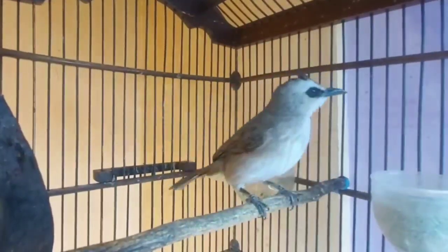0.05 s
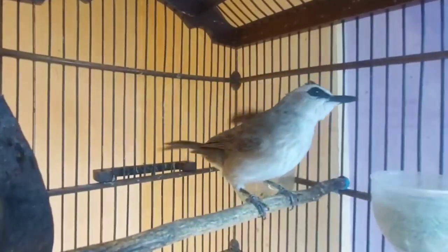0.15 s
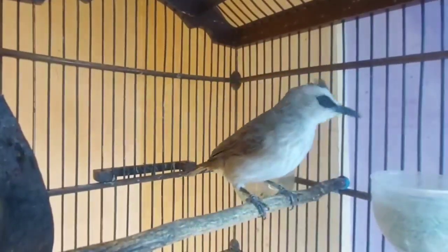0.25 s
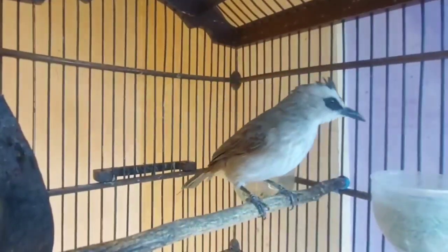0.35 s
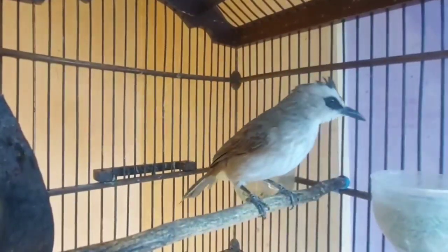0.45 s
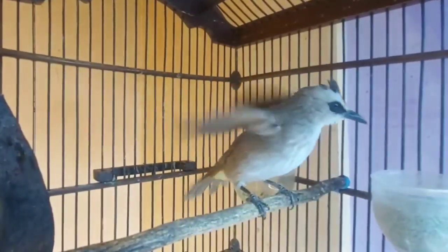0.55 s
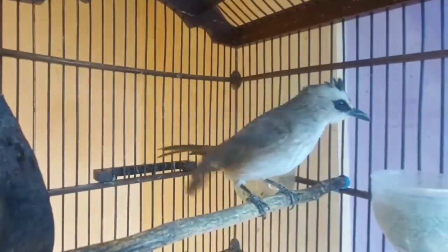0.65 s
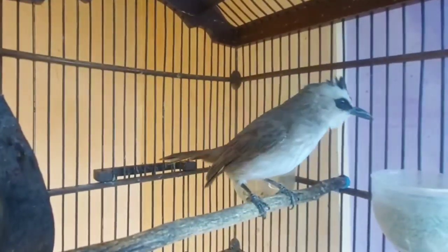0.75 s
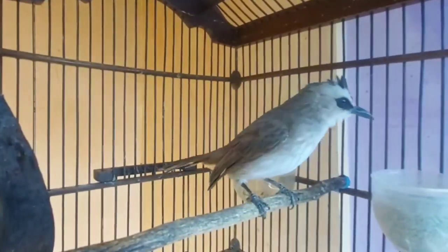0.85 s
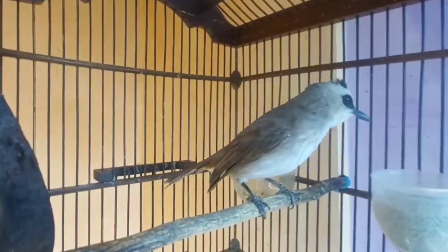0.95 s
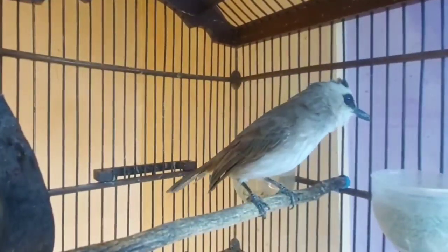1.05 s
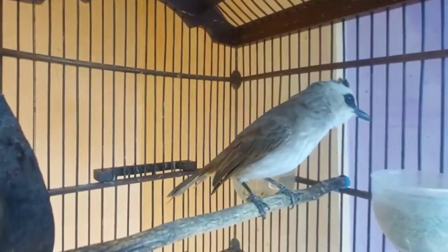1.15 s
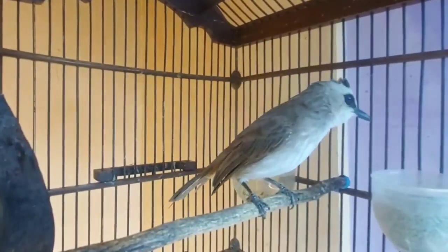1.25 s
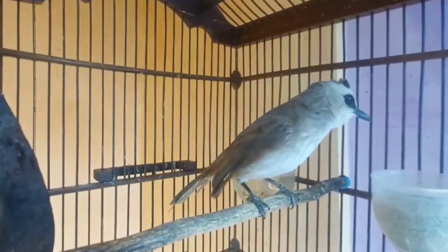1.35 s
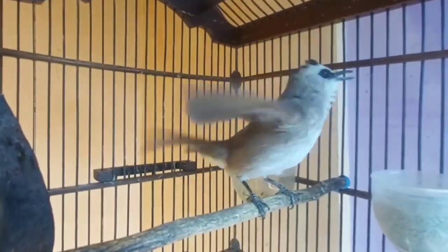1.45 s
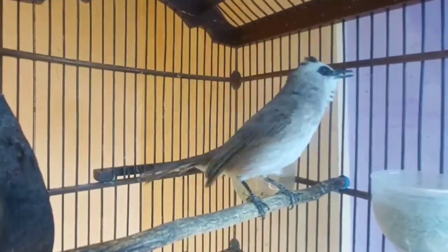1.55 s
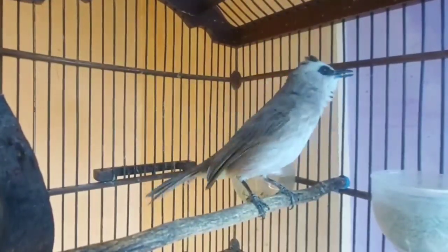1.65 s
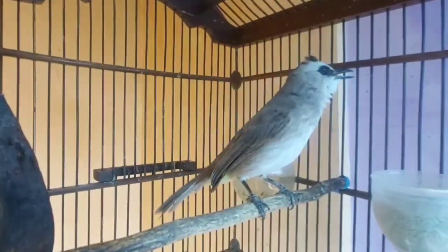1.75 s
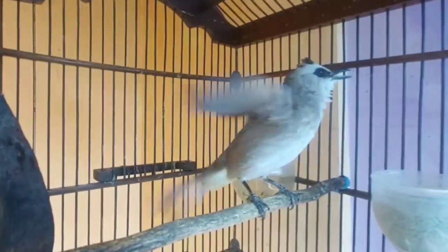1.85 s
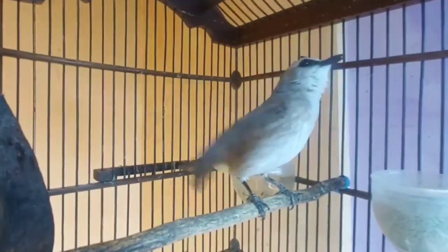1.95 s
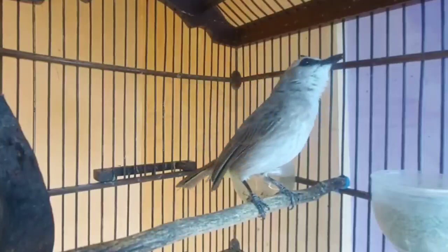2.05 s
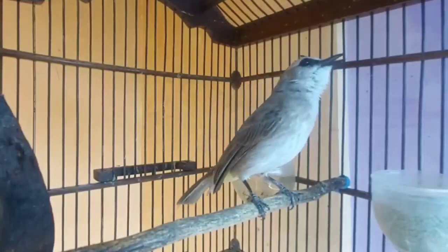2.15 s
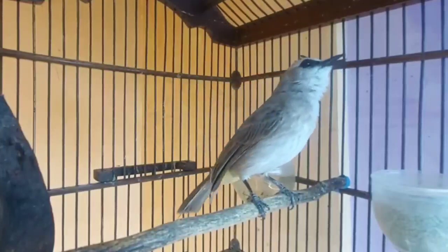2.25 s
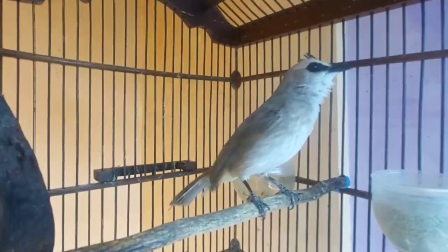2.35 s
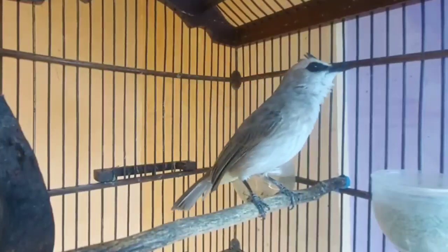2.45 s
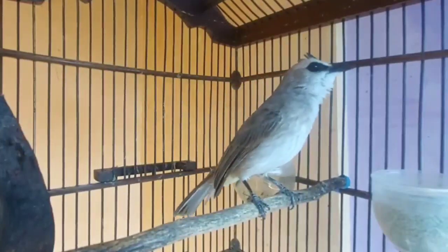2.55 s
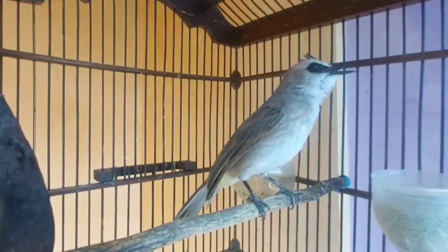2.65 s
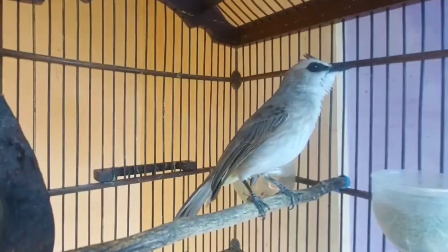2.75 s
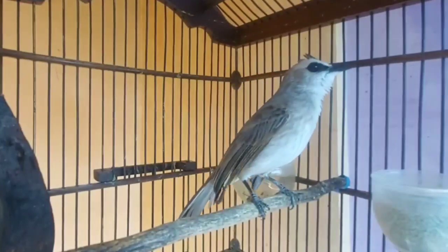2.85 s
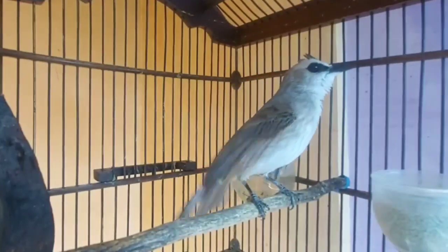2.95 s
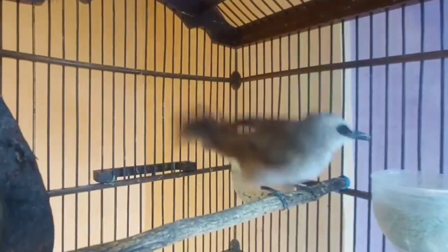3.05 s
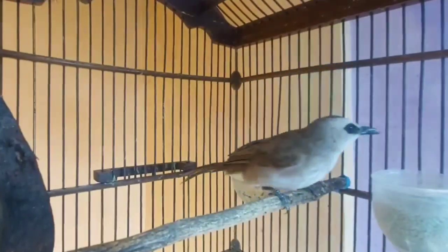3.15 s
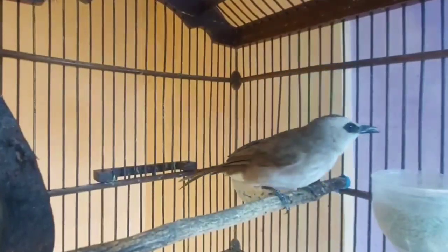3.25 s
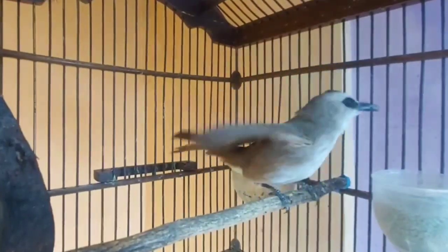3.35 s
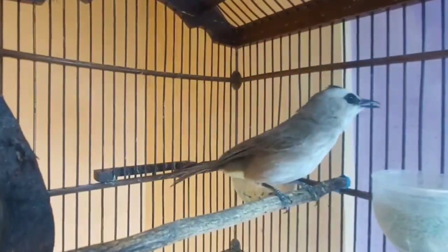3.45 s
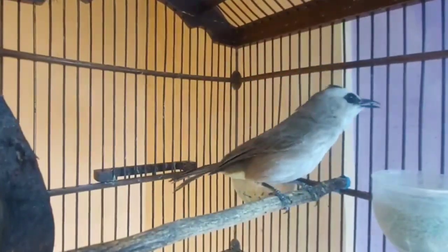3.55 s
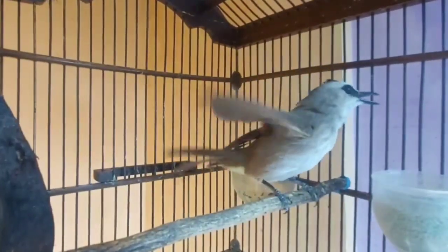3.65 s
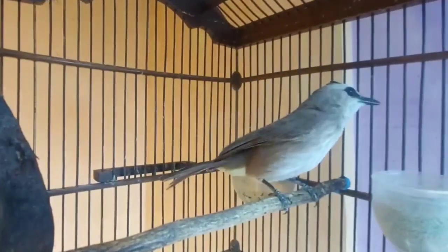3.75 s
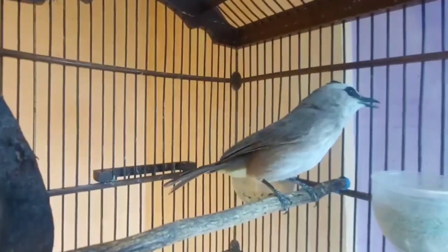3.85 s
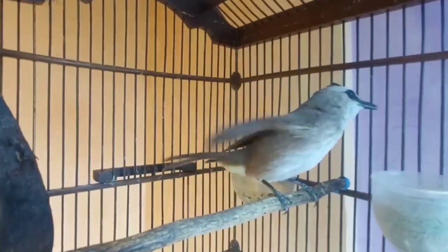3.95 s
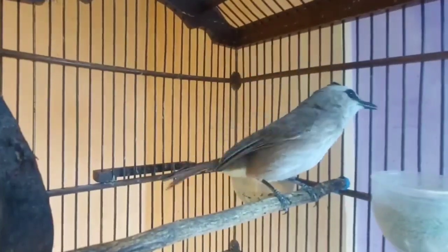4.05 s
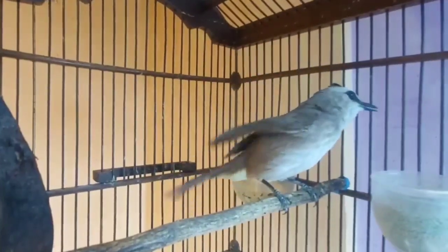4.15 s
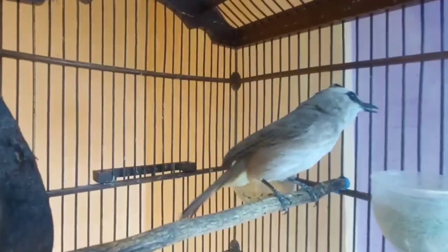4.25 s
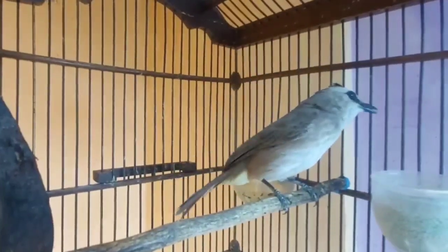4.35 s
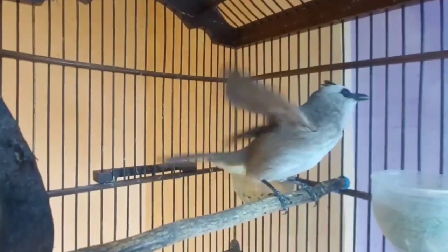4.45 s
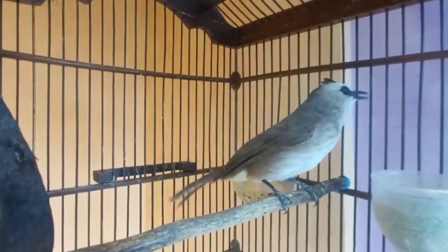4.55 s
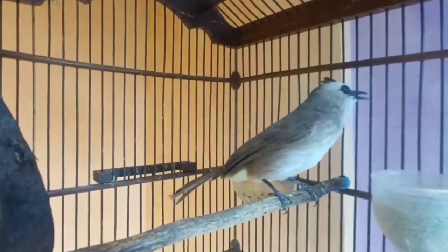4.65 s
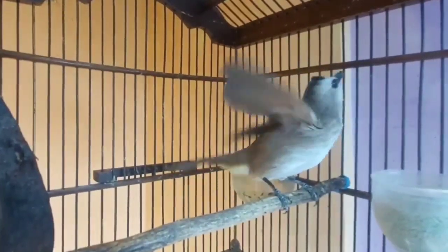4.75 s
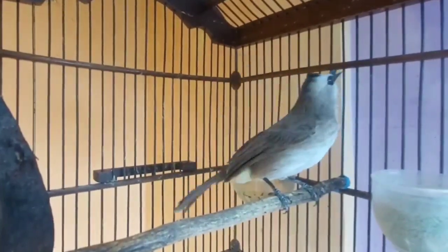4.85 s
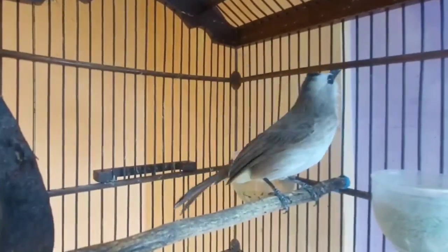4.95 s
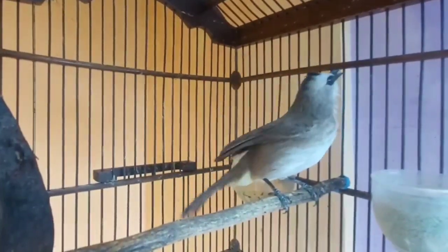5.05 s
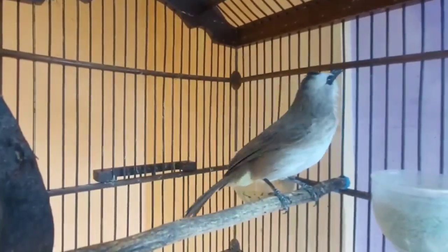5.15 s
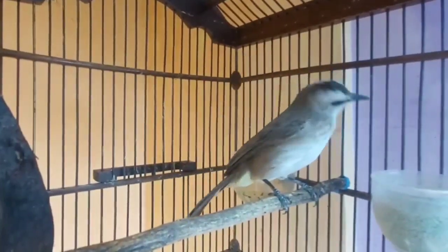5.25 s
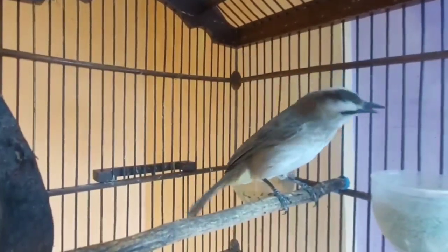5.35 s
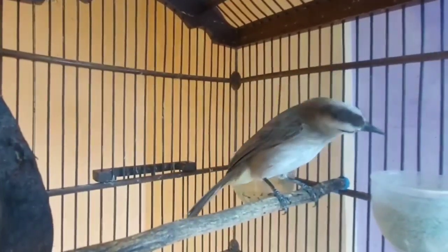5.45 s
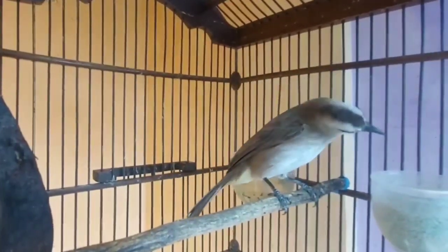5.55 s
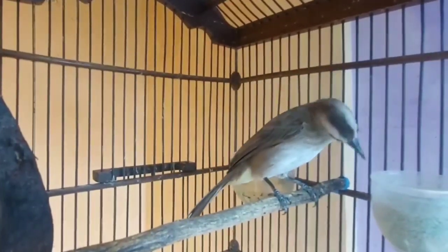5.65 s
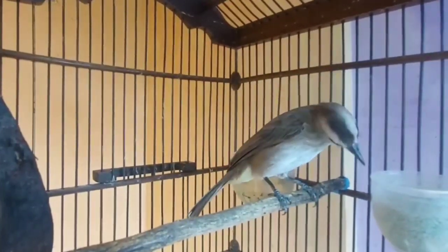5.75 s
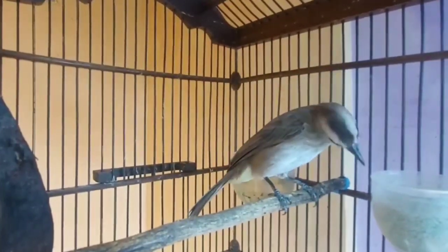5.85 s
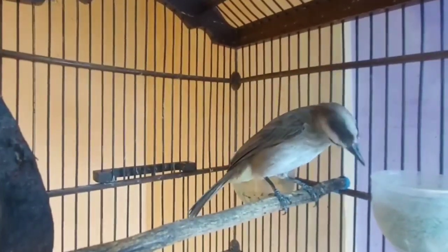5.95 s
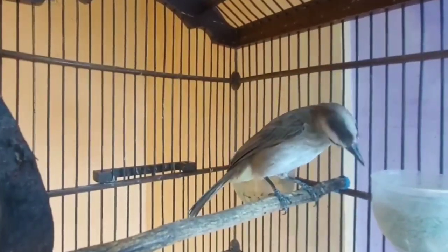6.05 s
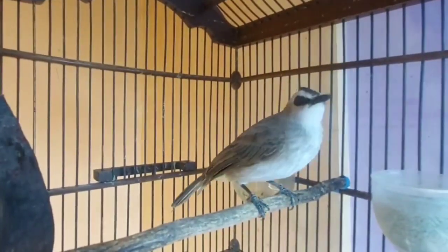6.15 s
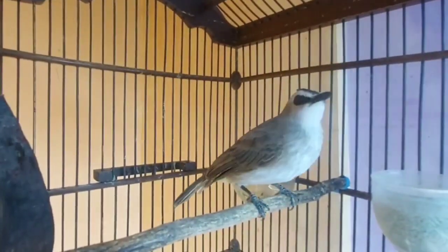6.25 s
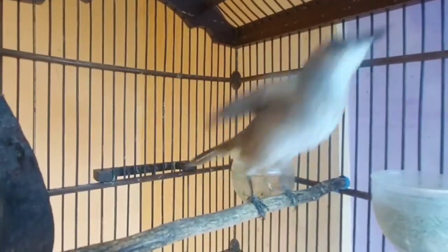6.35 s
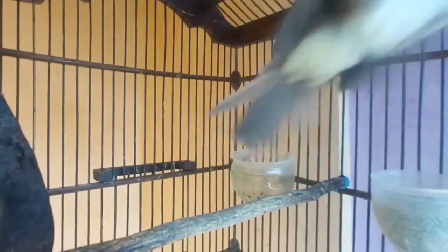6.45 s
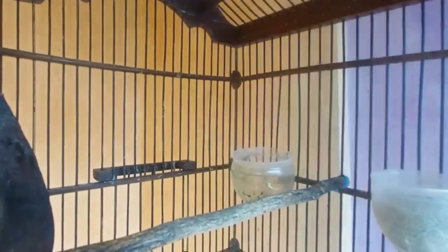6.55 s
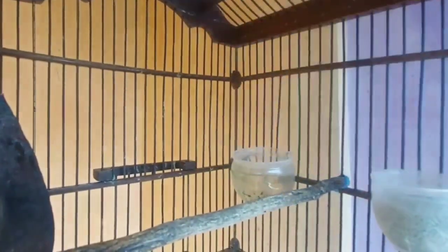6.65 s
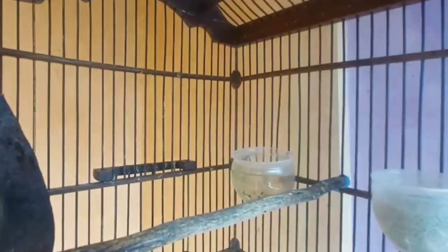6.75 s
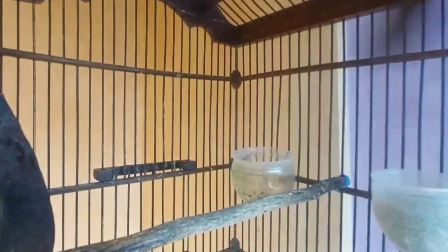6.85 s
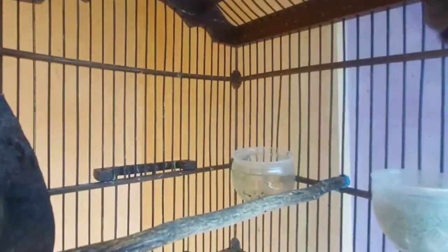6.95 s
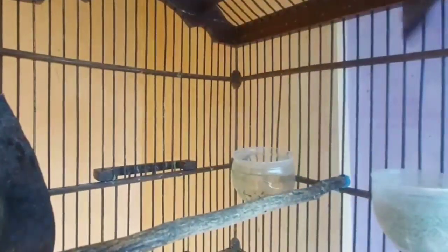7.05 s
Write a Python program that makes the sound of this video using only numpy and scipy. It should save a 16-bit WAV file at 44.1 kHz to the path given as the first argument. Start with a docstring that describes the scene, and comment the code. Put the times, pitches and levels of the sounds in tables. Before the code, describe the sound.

Loud, bright bird calls in a small room: chups, bubbling warbles, spaced chips, a wing flurry and fading yelps over low hum.

```python
"""Faint whistles of other birds over rumble, hiss and mains hum, then a caged bulbul close by, indoors:
two low chups, three bubbling phrases, a run of sharp chips, two cheeps and three yelps as it flies off.
Calls are buzzing sine sweeps with overtones and air noise; far birds are gliding sines.
Wings and claws are shaped noise; the hum is sines, rumble and hiss are noise.
Discrete echoes and a decaying tail of sparse taps give the near walls and the room."""
import sys
import numpy as np
from scipy import signal
from scipy.fft import rfft, irfft, next_fast_len
from scipy.io import wavfile

SR = 44100
rng = np.random.default_rng(int(sys.argv[2]) if len(sys.argv) > 2 else 0)


def dump(signal):
    """Clip the signal to [-1, 1] and save it as 16-bit WAV at the path in sys.argv[1]."""
    limited = np.clip(np.atleast_2d(signal).T, -1, 1)
    pcm = np.round(limited * 32767).astype(np.int16)
    wavfile.write(sys.argv[1], SR, pcm)


N = 312669

# Syllable shapes, before each call's stretch, pitch factor and level:
# time_s, pitch_hz, level_db, buzz_depth [share of pitch], second_harmonic_db [re fundamental]
CHUP = [(0, 2595, -26.5, 0.0061, -27.5), (.005, 2500, -17, 0.037, -25.5), (.008, 1968, -3, 0.088, -29),
        (.013, 2029, -5, 0.032, -37), (.020, 1888, 1.5, .01, -30), (0.028, 1610, -7, .01, -32.5),
        (.034, 1473, -5.5, 0.00032, -25.5), (.039, 1338, -20, .02, -36)]
CHIP = [(0, 2687, -26.5, 0.0016, -26.5), (.0045, 2346, -7, .01, -30.5), (.011, 2056, -13, 0.027, -5.5),
        (0.0138, 2978, 1, 0.0028, -31), (0.02, 2875, -3.5, 0.037, -39), (.028, 2389, -5, 0.083, -28),
        (.036, 2341, 1, .012, -36), (.055, 2144, -6.5, .008, -32.5), (.058, 2101, -22, .006, -37.5)]
BUZZ = [(0, 4095, -34.5, 0.088, -47), (.006, 3510, -7, .16, -20), (.010, 2839, 2.5, 0.071, -36.5),
        (.022, 2440, 2, 0.1, -40.5), (.055, 2050, -2.5, .19, -29.5), (.074, 1807, -13.5, 0.15, -22),
        (.081, 1630, -43, .1, -33)]
RISE = [(0, 894, -25.5, 0.054, 4), (.004, 1096, -21, .05, 12.5), (.015, 1467, -9.5, .05, -6.5),
        (.024, 2067, 2.5, 0.027, -38.5), (.035, 2390, -0.5, 0.029, -47.5), (.044, 2780, -12.5, .015, -33.5),
        (.049, 2662, 2, 0.013, -41), (.057, 1285, -7.5, 0.14, -25.5)]
WHISTLE = [(0, 2710, -6.5, .005, -49), (.004, 2805, 7, 0.0068, -41), (.010, 2700, 2, 0.0053, -48),
           (0.016, 2450, 8, .002, -39.5), (.027, 2274, -22, 0.00019, -40.5)]
UPSLUR = [(0, 1215, -19.5, .03, -31.5), (.005, 1955, -7, 0.056, -25.5), (.011, 2940, 0.5, 0.026, -47),
          (0.02, 2790, -11.5, .006, -25.5), (0.03, 2853, 4.5, 0.0043, -50), (.043, 3057, -3, 0.0063, -27),
          (.053, 3190, 3, .006, -37.5), (0.058, 3545, -3, 0.0054, -31), (.065, 3450, -40.5, .01, -41)]
DROP = [(0, 3230, -33, 0.018, -22), (.004, 2723, 0.5, 0.033, -52), (.010, 2180, 0.5, 0.062, -25),
        (0.016, 1476, -12.5, 0.025, -4.5), (.026, 1126, -23, 0.16, 3), (0.042, 1284, -20.5, 0.22, -4.5),
        (0.05, 2100, -18, .04, -23.5), (.053, 1990, -3, .01, -32), (0.067, 1710, -17.5, .012, -34.5)]
CHEEP = [(0, 3480, -16, 0.017, -26), (.004, 2940, -3.5, 0.031, -34), (.008, 2683, 6, 0, -29),
         (0.012, 2400, -10.5, .02, -13), (.016, 2504, 3, .003, -22), (.023, 2370, 5.5, .006, -27),
         (.031, 2167, 1, 0.0094, -15.5), (.040, 2220, -15, 0, -37)]
YELP = [(0, 3440, -48, 0.0035, -30), (.004, 2813, 6.5, 0.013, -36), (.007, 2567, 10.5, .03, -34),
        (.010, 1627, -3, 0.019, 2.5), (.012, 1914, -0.5, 0.055, 2), (0.017, 2280, 10, 0.026, -16.5),
        (0.022, 2300, 10, .01, -46), (.030, 2165, 7, .01, -48), (.035, 2080, -25, .01, -31)]
# Filters for overtones and air: beak nearly shut, open, gaping, head turned away: freq_hz, gain_db
SHUT = [(3000, -12.5), (4500, -36), (5700, -36), (7500, -44), (11500, -39), (14500, -37.5), (16500, -39.5)]
OPEN = [(3000, -19.5), (4300, -35), (5400, -39.5), (6700, -38), (8000, -46.5), (9200, -33.5), (10300, -21),
        (11800, -31), (13000, -36.5), (14300, -42), (15300, -43), (16500, -49.5)]
WIDE = [(3000, -20), (4300, -33), (5400, -37.5), (6700, -37.5), (7900, -46.5), (9200, -23), (10300, -25.5),
        (11800, -24.5), (13000, -27), (14300, -51), (15300, -38), (16500, -41.5)]
AWAY = [(3000, -9.5), (5500, -33), (7200, -40.5), (8000, -40), (10200, -42), (11600, -30), (13000, -38),
        (14800, -28), (16500, -31)]
# Two low opening chups: start_s, level_db
CHUPS = [(0.807, -1.5), (1.121, -1)]
# Falling buzz that opens each phrase: start_s, level_db, stretch [x time], pitch [x]
BUZZES = [(1.508, -9.5, 1.144, 0.92), (1.884, -8.5, 1.165, 0.93), (2.298, -9, .89, 0.98)]
# Deep swoop in the last phrase: start_s, level_db
DROPS = [(2.371, -7)]
# Warble that ends each phrase: start_s, level_db, pitch [x], harsh_db
WARBLES = [(1.633, -10.5, 1.002, 2.5), (2.029, -9.5, 1.0, 0.5), (2.523, -10, 0.97, 1)]
# Notes of a warble: delay_s, shape, level_db, overtones_first_db, overtones_last_db
WARBLE = [(0, RISE, 1, -6.5, 3.5), (.071, WHISTLE, -1, 3.5, -8.5), (.131, UPSLUR, -0.5, 6.5, 0)]
# Run of chips: start_s, level_db, stretch [x time], pitch [x], harsh_db, added_buzz_depth [share of pitch]
CHIPS = [(3.475, -5, 0.74, .9, 6, .05), (3.725, -4, 0.98, 0.94, 1, .005), (3.962, -4, 0.89, 0.93, 3, .035),
         (4.173, -2.5, 0.92, 0.98, 0.5, .003), (4.299, -2.5, 0.88, 0.97, 1.5, .003),
         (4.461, -2.5, 0.95, 0.98, 1, .003), (4.589, -2, .86, 0.98, 0.5, .003),
         (4.759, -3.5, 0.97, 1.01, 0.5, .01), (4.904, -5, 0.94, 0.97, .5, .015),
         (5.084, -4, 1, 0.99, -0.5, 0.017), (5.434, -5.5, 0.95, 0.99, 2.5, 0.0217)]
# Cheeps at take-off: start_s, level_db, stretch [x time], pitch [x], harsh_db
CHEEPS = [(6.560, -13.5, 1.33, .95, 1), (6.651, -7, .72, 1.0, -1)]
# Yelps in flight: start_s, level_db, stretch [x time], pitch [x]
YELPS = [(6.731, -13.5, 1.09, 1.02), (6.813, -13.5, .88, 0.96), (6.901, -17, .99, .99)]
# Voicing of each kind: calls, shape, beak, overtones_first_db, overtones_last_db
KINDS = [(CHUPS, CHUP, SHUT, 3.97, -1), (BUZZES, BUZZ, OPEN, 5.1, -8), (DROPS, DROP, OPEN, 1.89, -4),
         (CHIPS, CHIP, WIDE, 5.6, -9), (CHEEPS, CHEEP, AWAY, 7.4, -20), (YELPS, YELP, AWAY, 0.82, -11)]
# Reflections from near surfaces: delay_ms, gain [x]
ECHOES = [(1.25, 0.057), (2.2, 0.1), (3.9, 0.053), (4.95, 0.27), (6.9, 0.11), (8.0, 0.28), (11.3, 0.091),
          (12.5, 0.16), (18, 0.13)]
# Base decay of the room: freq_hz, t60_s
ROOM = [(300, 0.54), (1500, 0.28), (2500, 0.33), (5000, 0.22), (10000, 0.21), (16000, 0.12)]
# Wing and feather strokes: start_s, length_s, hiss_db, push_db
WINGS = [(0.161, 0.2, -55.5, -60), (0.572, 0.29, -54, -39.5), (0.867, 0.31, -57.5, -35),
         (1.146, 0.16, -61, -55), (1.45, 0.16, -48.5, -52), (3.025, 0.13, -65.5, -58),
         (3.351, 0.16, -54, -42), (6.441, 0.14, -47, -36), (6.551, 0.067, -34.5, -40),
         (6.93, 0.13, -65, -50.5)]
# Spectra of feather hiss and pushed air, relative: freq_hz, density_db [per Hz]
FEATHERS = [(500, -1.5), (2000, 2), (5000, -3.5), (8000, -5), (12000, 1.5), (15500, -2.5)]
AIR = [(25, -15.5), (70, 7), (150, -18.5), (300, -26), (700, -23), (2000, -54)]
# Claws and wingtips on the cage: start_s, level_db, t60_s
TICKS = [(0.907, -40.5, 0.01), (3.192, -45.5, 0.015), (6.461, -40, 0.017), (6.621, -24, 0.049),
         (6.989, -49, 0.033)]
# Soft rustle, level curve: time_s, level_db
RUSTLE = [(3.18, -91.5), (3.23, -62.5), (3.27, -48.5), (3.33, -54), (3.38, -47), (3.45, -60), (3.52, -90)]
# Spectrum of the rustle, relative: freq_hz, density_db [per Hz]
RUSTLE_COLOUR = [(1200, -18), (2500, 1.5), (3800, -2), (5200, -6), (6500, -24.5), (12000, -42.5)]
# Whistles of far birds, before flutter and room: start_s, first_hz, last_hz, level_db
FAR_BIRDS = [(0.026, 2800, 3106, -46), (0.185, 2310, 2696, -36), (0.402, 2032, 3240, -43.5),
             (0.479, 2980, 3260, -40.5), (0.675, 2604, 2390, -32), (0.9, 3320, 3670, -41),
             (1.071, 2070, 2610, -33.5), (1.23, 3746, 4050, -45), (1.405, 2296, 2920, -42),
             (2.98, 2960, 3210, -61), (5.767, 4010, 4110, -56.5), (5.84, 3890, 3480, -58),
             (5.94, 3690, 3360, -59.5), (6.115, 2590, 4130, -52), (6.255, 2505, 2960, -49.5),
             (6.335, 2370, 2240, -45), (6.35, 3170, 3900, -60), (6.405, 2280, 2220, -40.5),
             (6.48, 2280, 2190, -40.5)]
# Background level curves, before the offsets in background(): time_s, rumble_and_hiss_db, hum_db
BACKGROUND = [(0.05, -38, -32.5), (0.11, -38.5, -34), (1.5, -40, -31), (1.54, -54, -43), (1.6, -51, -43),
              (3.17, -50, -48), (3.47, -34, -30.5), (3.51, -45.5, -46.5), (4.11, -50, -47.5),
              (5.04, -50, -49), (5.7, -47, -45), (6.34, -43, -49), (6.38, -40.5, -38.5), (6.65, -36.5, -35),
              (6.73, -41.5, -45), (7.0, -45, -42)]
# Spectra of rumble and hiss, relative: freq_hz, density_db [per Hz]
RUMBLE = [(28, -17), (42, -1), (91, -1), (108, -3), (130, -11.5), (168, -6.5), (264, -15.5), (302, -6),
          (340, -20.5), (438, -18.5), (554, -25.5), (1160, -37), (1400, -56), (1820, -65.5), (3080, -120)]
HISS = [(600, -19), (1200, 4), (2500, 5), (4000, -4), (5200, -10.5), (5800, -4.5), (6500, -13.5),
        (10000, -10.5), (15500, -18)]
# Lines of the mains hum, relative: freq_hz, level_db
HUM = [(99.8, -1), (199.6, -31), (299.7, -17), (400, -46), (507, -24)]

# Overtones swell with the second harmonic: dB per dB above that of a plain note
EDGE_SHARE, PLAIN_SECOND_DB = .25, -30.5
OVERTONE_RISE_S = .004  # time constant; overtones build up just after the tone
FAR_NOTE_S = .042
BAND_LIMIT_HZ = 15800


def amp(db):
    """Decibels to gain."""
    return 10 ** (np.asarray(db) / 20)


def unit(x):
    """Scale to rms 1."""
    return x / np.sqrt(np.mean(x ** 2) + 1e-20)


def read(points, hz):
    """Interpolate a spectrum on a log-frequency axis."""
    freq_hz, value = np.transpose(points)
    return np.interp(np.log(hz + 1), np.log(freq_hz + 1), value)


def curve(rows):
    """Interpolate a time curve at every sample."""
    return np.interp(np.arange(N) / SR, *np.transpose(rows))


def add(mix, start_s, sound):
    """Mix a sound into mix, in place, at start_s."""
    part = mix[max(0, round(start_s * SR)):][:len(sound)]
    part += sound[:len(part)]


def coloured(x, colour):
    """Filter by a spectrum in dB."""
    size = next_fast_len(len(x), True)
    gain = amp(read(colour, np.fft.rfftfreq(size, 1 / SR)))
    return irfft(rfft(x, size) * gain, size)[:len(x)]


def noise(colour):
    """Noise of rms 1 with the given spectrum."""
    return unit(coloured(rng.standard_normal(N), colour))


def wander(size, rate_hz):
    """Random curve: rate_hz unit-normal values a second, joined by straight lines."""
    at = np.arange(size) * rate_hz / SR
    return np.interp(at, np.arange(4096), rng.standard_normal(4096))


def syllable(shape, beak, first_db, last_db, level_db, stretch=1, pitch=1, harsh_db=0, rough=0,
             buzz_hz=290, uneven=.5, jitter=0.0042, drift=0.015, rasp=0.41, flutter=0.85,
             buzz_am=1.6, turbulence_db=-14):
    """One sweep of the syrinx: near sine, shaken by a fast buzz, with weak ragged overtones and air hiss."""
    shape_s, *columns = np.transpose(shape)
    t = np.arange(0, shape_s[-1] * stretch, 1 / SR)
    size = len(t)
    hz, db, depth, second_db = (np.interp(t, shape_s * stretch, column) for column in columns)
    depth = depth + rough
    overtones_db = np.linspace(first_db, last_db, size) + EDGE_SHARE * (second_db - PLAIN_SECOND_DB)
    # a slower, uneven vibration of the membranes swings both pitch and strength
    buzz = np.sin(2 * np.pi * np.cumsum(buzz_hz * (1 + uneven * wander(size, 300))) / SR)
    buzz_swing = depth * (buzz + rasp * wander(size, 1500))
    unsteady = jitter * wander(size, 1200) + drift * wander(size, 125)
    hz = hz * pitch * (1 + buzz_swing + unsteady)
    phase = 2 * np.pi * np.cumsum(hz) / SR
    strength = amp(level_db + db) * (1 + buzz_am * depth * buzz) * signal.windows.tukey(size, .04)
    tone = np.sin(phase) + amp(second_db + harsh_db) * np.sin(2 * phase)
    overtones = np.zeros(size)
    for k in range(3, 10):
        below_nyquist = k * hz < SR / 2
        overtones += below_nyquist * (1 + flutter * wander(size, 1500)) * np.sin(k * phase)
    air = amp(turbulence_db) * rng.standard_normal(size)
    # overtones and air both pass the resonances of throat and beak
    edge = amp(overtones_db + harsh_db) * (1 - np.exp(-t / OVERTONE_RISE_S))
    return strength * tone + coloured(edge * strength * (overtones + air), beak)


def bulbul():
    """Main bird: calls of a kind share one syrinx sweep; every warble repeats the same three notes."""
    song = np.zeros(N)
    for calls, *voice in KINDS:
        for start_s, *call in calls:
            add(song, start_s, syllable(*voice, *call))
    for start_s, level_db, pitch, harsh_db in WARBLES:
        for delay_s, shape, note_db, first_db, last_db in WARBLE:
            note = syllable(shape, OPEN, first_db, last_db, level_db + note_db,
                            pitch=pitch, harsh_db=harsh_db)
            add(song, start_s + delay_s, note)
    return song


def near_echoes(x):
    """Direct sound plus first reflections, which beat against each sweep."""
    out = x.copy()
    for delay_ms, gain in ECHOES:
        add(out, delay_ms / 1000, gain * x)
    return out


def movements(flicker_db=3):
    """Feathers hiss and push air in uneven strokes and rustle; claws tick with exponential decay."""
    hiss, push, taps = np.zeros((3, N))
    for start_s, length_s, hiss_db, push_db in WINGS:
        size = int(length_s * SR)
        stroke = signal.windows.tukey(size, .8) * amp(flicker_db * wander(size, 71.5))
        add(hiss, start_s, amp(hiss_db) * stroke)
        add(push, start_s, amp(push_db) * stroke)
    t = np.arange(SR // 10) / SR
    for start_s, level_db, t60_s in TICKS:
        add(taps, start_s, amp(level_db) * np.exp(-np.log(1000) * t / t60_s))
    rustle = amp(curve(RUSTLE)) * noise(RUSTLE_COLOUR)
    return (hiss + taps) * noise(FEATHERS) + push * noise(AIR) + rustle


def far_birds():
    """Short gliding sine whistles, fluttering in pitch and strength."""
    out, size = np.zeros(N), int(FAR_NOTE_S * SR)
    for start_s, first_hz, last_hz, level_db in FAR_BIRDS:
        hz = np.linspace(first_hz, last_hz, size) * (1 + .022 * wander(size, 400))
        strength = amp(level_db + 3 * wander(size, 150)) * signal.windows.tukey(size, .4)
        add(out, start_s, strength * np.sin(2 * np.pi * np.cumsum(hz) / SR))
    return out


def background(rumble_db=4.5, hum_db=-1.5, hiss_db=-17, waver_db=1):
    """Noise rumble and hiss share one level curve; wavering sine lines of mains hum follow another."""
    t = np.arange(N) / SR
    time_s, wash_level_db, hum_level_db = np.transpose(BACKGROUND)
    hum = np.zeros(N)
    for hz, line_db in HUM:
        line = np.sqrt(2) * np.sin(2 * np.pi * (hz * t + rng.random()))
        hum += amp(line_db + waver_db * wander(N, 3.9)) * line
    wash = amp(rumble_db) * noise(RUMBLE) + amp(hiss_db) * noise(HISS)
    wash_gain = amp(np.interp(t, time_s, wash_level_db))
    hum_gain = amp(hum_db + np.interp(t, time_s, hum_level_db))
    return wash_gain * wash + hum_gain * hum


def room(x, gap_s=0.0073, early=1.0, early_s=0.066, treble_db=3):
    """Tail of sparse taps: each band decays at its own speed, early part and treble lifted."""
    taps = rng.choice([-1., 1.], SR) * (rng.random(SR) < .1) * (np.arange(SR) > gap_s * SR)
    hz, t, bands = signal.stft(taps, SR, nperseg=256)
    decay = np.exp(-np.log(1000) * t / read(ROOM, hz)[:, None])
    decay = decay * (1 + early * np.exp(-t / early_s))
    tail = signal.istft(bands * decay, SR, nperseg=256)[1]
    tail = coloured(tail / np.linalg.norm(tail), [(6000, 0.0014), (10000, treble_db)])
    return signal.fftconvolve(x, tail)[:N]


def scene(song_db=-2, room_db=-11.5, far_direct_db=-10, far_room_db=0):
    """Mix: near bird mostly direct, far birds mostly room."""
    near, far = amp(song_db) * bulbul(), far_birds()
    moving = movements()
    wet = room(amp(room_db) * (near + moving) + amp(far_room_db) * far)
    return (near_echoes(near) + moving + amp(far_direct_db) * far + wet + background())[None]


def record(dry, low_cut_hz=38):
    """The microphone drops deep bass, peaks beyond full scale clip, then a low-pass limits the band."""
    thinned = signal.sosfilt(signal.butter(4, low_cut_hz, "highpass", fs=SR, output="sos"), dry)
    clipped = np.clip(thinned, -1, 1)
    lowpass = signal.firwin(601, BAND_LIMIT_HZ, window=("kaiser", 9), fs=SR)
    return signal.oaconvolve(clipped, lowpass[None], "same")


dry = scene()
out = record(dry)
dump(out)
```